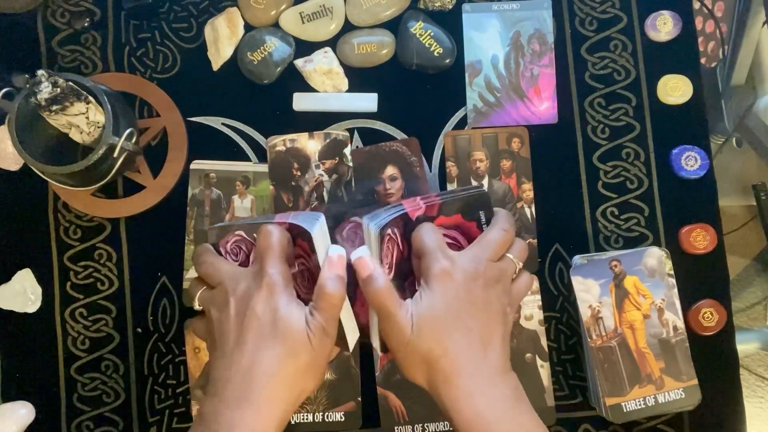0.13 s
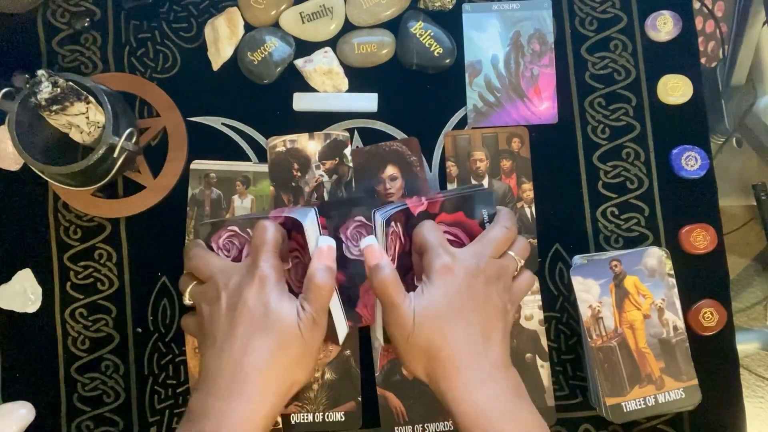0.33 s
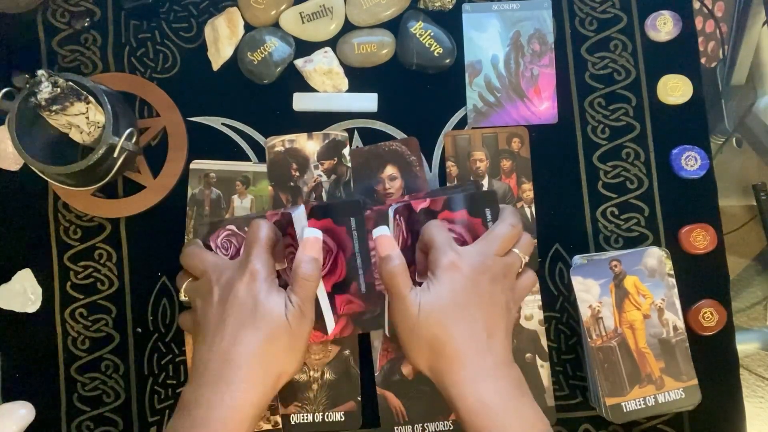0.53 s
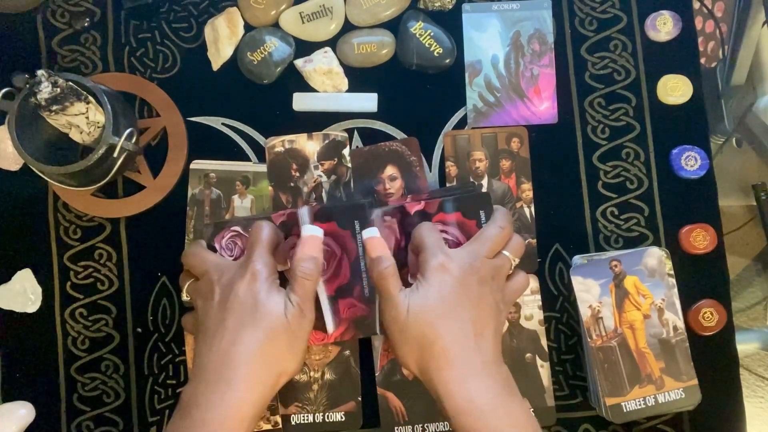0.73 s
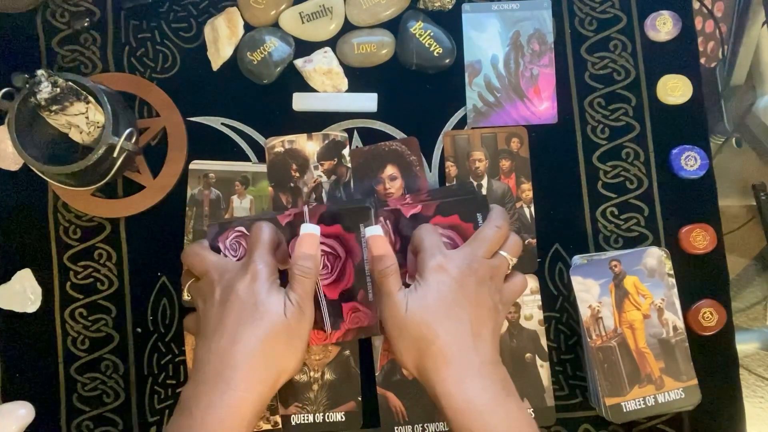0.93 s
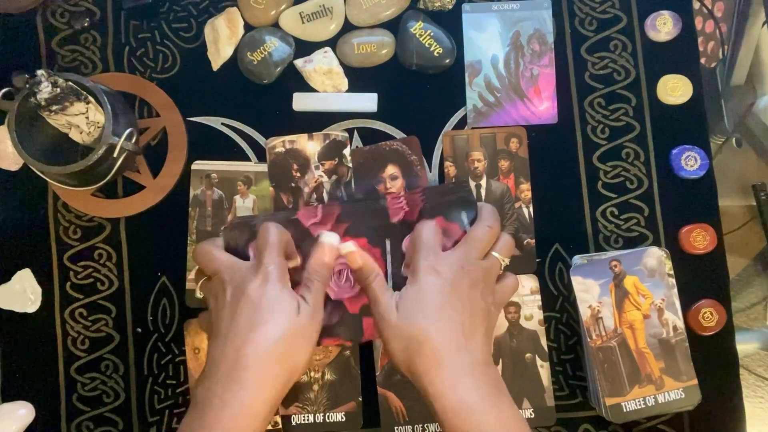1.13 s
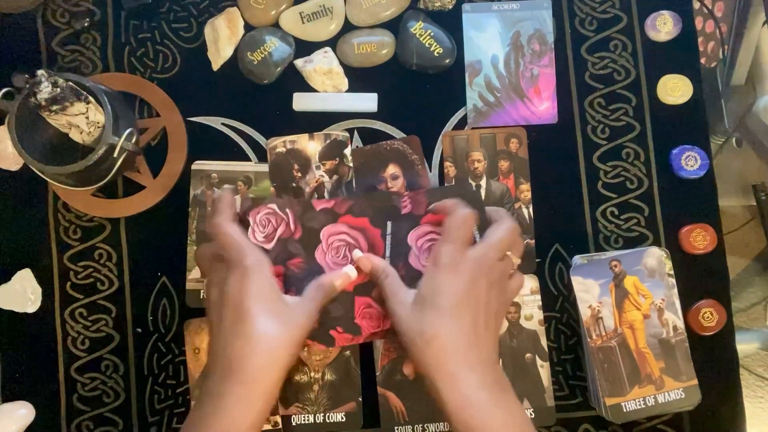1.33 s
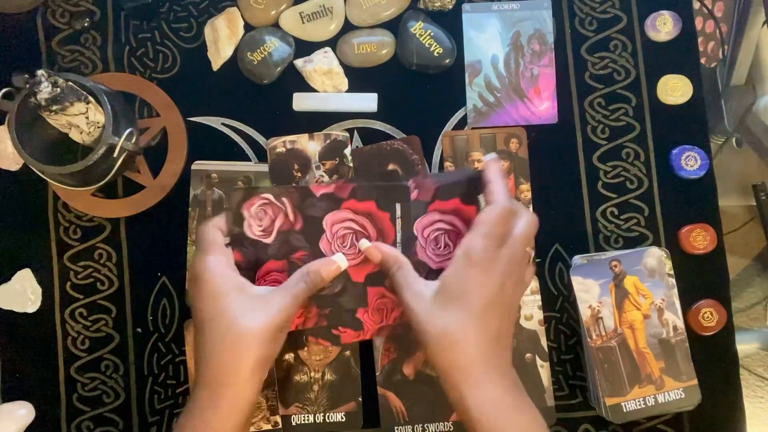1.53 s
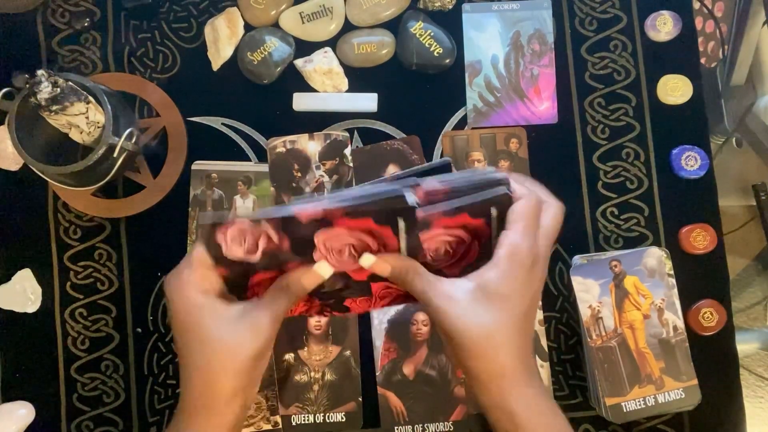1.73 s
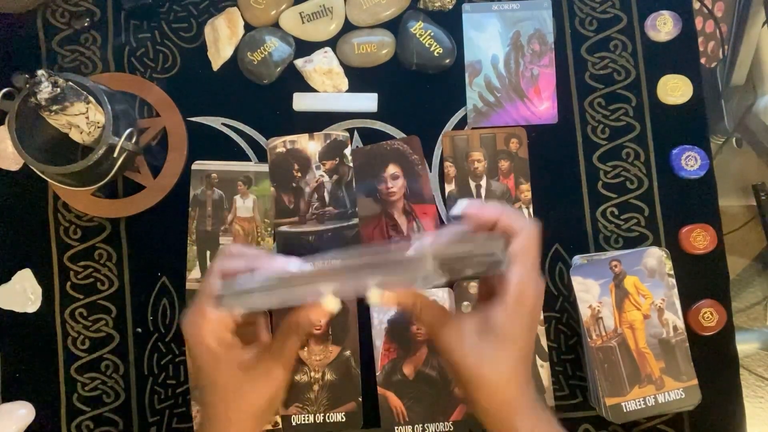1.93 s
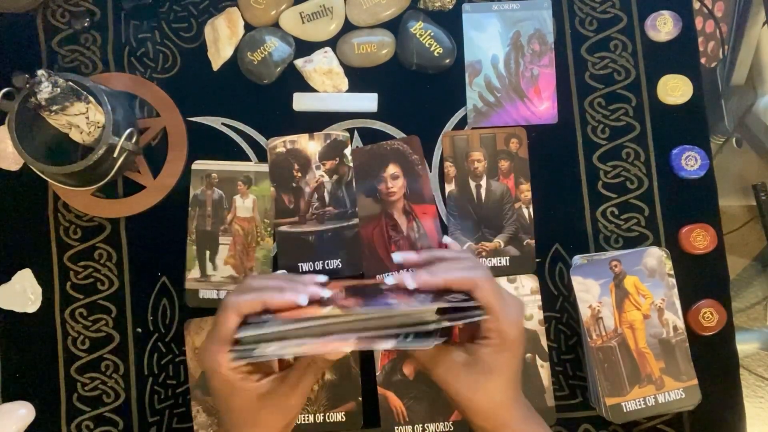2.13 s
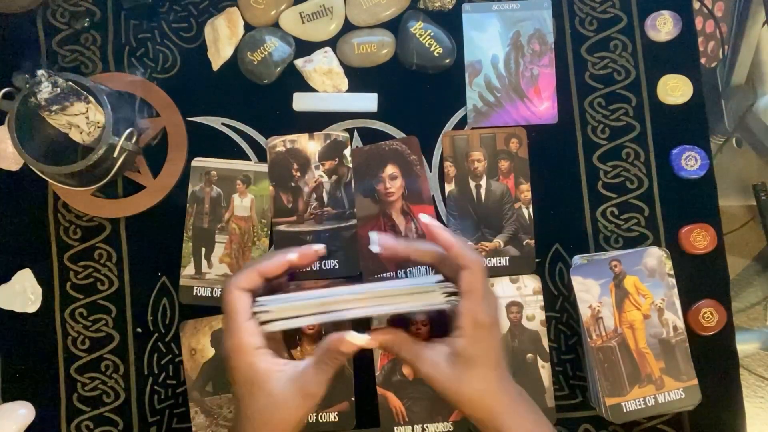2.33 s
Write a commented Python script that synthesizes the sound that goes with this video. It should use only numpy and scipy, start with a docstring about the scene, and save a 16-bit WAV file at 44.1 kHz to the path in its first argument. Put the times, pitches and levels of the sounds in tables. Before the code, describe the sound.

A deck of cards is riffle-shuffled close by, with uneven papery flicks and slaps for the first second. From about 1.1 seconds the halves are pushed together with light ticks and a soft slide, turning to a hollow hiss near 1.8 as the deck arches. At 2.1 it falls into one pile in a quick snapping flutter. Hands rumble faintly on the tablecloth in a small room.

```python
"""Uneven flicks and slaps: large cards scrape off the thumbs and land, riffled by hand over a
cloth-covered table in a small room. The halves are pushed together with a few light ticks, then
arched with a soft, hollow sliding hiss. The arch falls into one pile in a quick flutter: packets
snap flat, and the air pocket under them rings low, rising as it closes. Hands rumble on the
cloth; the cards set off a low room boom and a short ring."""
import sys
import numpy as np
from scipy import signal
from scipy.fft import rfft, irfft, next_fast_len
from scipy.io import wavfile
from scipy.ndimage import uniform_filter1d

SR = 44100
rng = np.random.default_rng(int(sys.argv[2]) if len(sys.argv) > 2 else 0)


def put_to_file(sound):
    """Save the sound as 16-bit audio at rate SR, in the file named by the first command-line argument."""
    columns = np.atleast_2d(sound).T  # one column per channel
    safe = np.clip(columns, -1, 1)
    whole_steps = np.round(safe * 32767)
    wavfile.write(sys.argv[1], SR, whole_steps.astype(np.int16))


N = 110250
TIME_S = np.arange(N) / SR

# room noise spectrum: f/Hz, relative level/dB
FLOOR_COLOUR = [(20, -32.5), (48, -2.5), (85, -16), (135, 1.5), (200, -4.5), (400, -14), (800, -14),
                (2000, -24), (6000, -31.5), (15000, -54)]
# hands on the cloth: t/s, level/dB
HANDS_LEVEL = [(0, -59), (.18, -45), (.5, -55), (.8, -55), (1.02, -45.5), (1.15, -63.5), (1.6, -63),
               (1.78, -55), (2.05, -61), (2.21, -60), (2.33, -54), (2.47, -59.5)]
# their spectrum: f/Hz, relative level/dB
CLOTH_COLOUR = [(25, -27), (45, 2.5), (90, -7), (127, 1), (170, -9.5), (260, -13.5), (500, -21.5),
                (1500, -55.5)]
# edges of the five contact bands (thud, slap, clack, crack, edge): f/Hz
CONTACT_BANDS_HZ = [250, 700, 1400, 2300, 5600, 15000]
# contact spectrum before band shaping: f/Hz, gain/dB
CONTACT_COLOUR = [(40, -17.5), (120, -7.5), (200, -9.5), (380, 5), (600, 6.5), (950, 15), (1400, 4),
                  (1900, -3), (2500, 1), (4500, 6.5), (7000, 0), (13000, -6), (16000, -13)]
# cards leaving the thumbs: t/s, 5 x band level/dB
FLICK_HITS = [(0.0338, -41.5, -41, -52.5, -53, -51), (0.0683, -42.5, -39.5, -40, -34.5, -36.5),
              (0.0783, -39, -58, -36, -43, -40), (0.0944, -84, -29.5, -28, -25, -28.5),
              (0.1264, -57, -34, -66, -40, -35), (0.146, -30.5, -26.5, -18.5, -27, -25),
              (0.1545, -42.5, -26, -25, -30, -28), (0.1706, -26.5, -28, -26.5, -26, -26),
              (0.2509, -70, -36.5, -34.5, -28, -30.5), (0.2705, -30.5, -25.5, -24.5, -22.5, -24.5),
              (0.2758, -29.5, -31.5, -22, -27, -29), (0.3088, -32.5, -25, -20.5, -23.5, -19),
              (0.3293, -45, -63, -53.5, -37, -34), (0.3492, -40, -39, -69.5, -49.5, -56),
              (0.3643, -34, -26.5, -26.5, -24.5, -21), (0.3922, -22.5, -18.5, -18.5, -26, -28),
              (0.4095, -39, -16.5, -22, -19.5, -17.5), (0.417, -31, -20.5, -16.5, -22, -19),
              (0.4261, -22.5, -14.5, -15, -22, -20), (0.4774, -57, -37, -36.5, -35.5, -40),
              (0.52, -37, -38, -51, -40, -42), (0.5331, -29, -24.5, -25, -26.5, -31.5),
              (0.621, -39, -33.5, -55, -45, -45), (0.631, -64, -36, -36, -36, -40),
              (0.6354, -22.5, -24, -20.5, -30.5, -30.5), (0.6462, -24, -16, -23.5, -28.5, -33.5),
              (0.7451, -35.5, -31.5, -38, -32, -36.5), (0.7609, -21, -19, -17.5, -23.5, -20.5),
              (0.7755, -27.5, -26.5, -21.5, -16.5, -16.5), (0.7785, -43, -28.5, -30, -18, -20.5),
              (0.8584, -45, -39, -47, -31, -34), (0.8752, -24, -18.5, -21, -22.5, -25.5),
              (0.9268, -53, -65, -34.5, -24, -30.5), (0.9418, -33.5, -32, -33.5, -30, -34),
              (0.968, -49, -28, -51, -27.5, -30.5), (0.9741, -35, -35, -29.5, -29, -29),
              (0.9833, -29.5, -25, -28, -34, -35), (1.0044, -39, -38, -31, -30, -27.5),
              (1.0212, -24.5, -20.5, -23, -22.5, -19.5), (1.0322, -34, -33, -29.5, -39, -32)]
# bent cards rustling under the thumbs: t/s, level/dB
RUSTLE_LEVEL = [(0.059, -62), (0.096, -38), (.13, -44), (.22, -48.5), (0.279, -35.5), (.46, -50),
                (.51, -58), (.58, -48), (.72, -56), (.81, -47), (.9, -49), (.98, -38.5), (1.041, -51),
                (1.1, -67)]
# rustle and flutter spectrum: f/Hz, relative level/dB
PAPER_COLOUR = [(60, -11), (250, 0.5), (500, 4.5), (900, 5), (1800, 1.5), (4000, -5.5), (8000, -10),
                (13000, -22), (16000, -22.5)]
# cards springing free: t/s, f/Hz, level/dB, t60/s
SPRING_RINGS = [(.364, 6560, -3.5, 0.0042), (0.774, 1950, -9.5, 0.04)]
# card faces sliding: t/s, level/dB
SLIDE_LEVEL = [(1.08, -57), (1.2, -61.5), (1.33, -76), (1.338, -47), (1.365, -58), (1.42, -53), (1.49, -63),
               (1.53, -50), (1.595, -60), (1.61, -50.5), (1.67, -50), (1.7, -58), (1.755, -64),
               (1.8, -45.5), (1.87, -45.5), (1.96, -56), (2.11, -53), (2.4, -81), (2.5, -59.5)]
# their spectrum: f/Hz, relative level/dB
HISS_COLOUR = [(100, -24), (400, -4), (900, -4.5), (2000, 1), (4000, -0.5), (8500, -8.5), (13000, -10),
               (16000, -17)]
# light ticks and a soft swell of sliding cards as the deck is handled: t/s, 5 x band level/dB
HANDLING_HITS = [(1.1184, -49.5, -66, -55, -53, -50), (1.1888, -53.5, -46, -44.5, -38, -45),
                 (1.3988, -63, -51.5, -40.5, -40, -40.5), (1.4273, -64, -51, -43.5, -49.5, -45),
                 (1.5256, -69, -63, -40, -44, -54), (1.5377, -47.5, -36.5, -40.5, -35.5, -39),
                 (1.6332, -48.5, -48, -33, -27, -31.5), (1.6459, -61, -37.5, -50, -63, -44),
                 (1.8805, -61, -73, -47, -39.5, -45), (2.418, -75, -56, -54, -52.5, -51)]
# hollow ring of the arched deck: t/s, level/dB
ARCH_LEVEL = [(1.74, -76), (1.775, -54.5), (1.87, -52.5), (2.1, -58.5)]
# its modes: f/Hz, bandwidth/Hz, relative level/dB
ARCH_RESONANCES = [(1620, 150, 0), (2280, 300, -6), (3050, 350, -6)]
# flutter of the falling arch: t/s, level/dB
FLUTTER_LEVEL = [(2.115, -60), (2.126, -28), (2.143, -35.5), (2.169, -29), (2.202, -28.5), (2.236, -46.5),
                 (2.331, -47), (2.39, -62.5)]
# packets snapping flat: t/s, 5 x band level/dB
SNAP_HITS = [(2.117, -76, -45, -39, -30.5, -38), (2.1298, -42, -34, -27, -27.5, -35),
             (2.1509, -29.5, -63, -21, -18.5, -29), (2.1705, -27, -27, -32, -22.5, -22.5),
             (2.1771, -30, -42, -23, -11.5, -26), (2.1962, -37, -51, -27.5, -21.5, -34),
             (2.2119, -32.5, -39, -27, -22.5, -30.5), (2.2492, -42, -46, -33, -45, -43),
             (2.2582, -45, -35.5, -29.5, -26, -32.5), (2.2895, -38.5, -35, -29, -26, -34)]
# air pocket under the falling arch: t/s, f/Hz, level/dB
POCKET_TRACK = [(2.115, 252.4, -81), (2.13, 256, -29), (2.201, 290, -34), (2.25, 306, -41.5),
                (2.3, 317.5, -70)]
# room boom and short ring set off by the cards: f/Hz, gain/dB, t60/s
LOW_RESONANCES = [(127, -60, .2), (398, -54, .08)]
# room tail: f/Hz, t60/s, level/dB, left-right correlation
ROOM_TAIL = [(60, 0.25, 7, 0.88), (137, 0.16, 6, 0.9), (348, 0.12, -1.5, 0.7), (940, 0.15, -9, -0.08),
             (2170, 0.16, -6, -0.44), (5030, 0.15, -10, 0.19), (13000, 0.16, -12.5, 0.43)]
# left microphone against right: f/Hz, phase lead/rad
LEFT_LEAD = [(40, 0.3), (400, -1.47), (1000, -0.65), (1600, -0.8), (2400, -2), (5200, -2.5), (6600, -5.5),
             (8600, -6), (10500, -2), (12500, 1.5), (15000, 1)]
# microphone response: f/Hz, gain/dB
MIC_COLOUR = [(8800, 0.5), (9700, 1.5), (10400, -14.5), (11300, -6.5), (12500, 1.5), (14300, -2),
              (15500, -17), (16400, -21.5)]


def from_db(db):
    """Decibels to gain."""
    return 10 ** (np.asarray(db) / 20)


def unit_rms(x):
    """Scale to unit rms."""
    return x / np.sqrt(np.mean(x ** 2) + 1e-20)


def envelope(curve):
    """Gain along a (t/s, level/dB) curve; -120 dB outside it."""
    t_s, db = np.transpose(curve)
    return from_db(np.interp(TIME_S, t_s, db, left=-120, right=-120))


def at_hz(table, hz, column=1):
    """Interpolate a table column over log frequency."""
    rows = np.array(table)
    return np.interp(np.log(np.maximum(hz, 1)), np.log(rows[:, 0]), rows[:, column])


def coloured(x, colour):
    """Minimum-phase filter with a (f/Hz, gain/dB) response."""
    n = 2 * next_fast_len(x.shape[-1])
    gain = from_db(at_hz(colour, np.fft.rfftfreq(n, 1 / SR)))
    cepstrum = irfft(np.log(gain))
    cepstrum[1:n // 2] *= 2
    cepstrum[n // 2 + 1:] = 0
    return irfft(rfft(x, n) * np.exp(rfft(cepstrum)))[..., :x.shape[-1]]


def ring(x, hz, t60_s):
    """Resonator: a unit click starts a decaying sine of height 1."""
    radius, step_rad = from_db(-60 / (t60_s * SR)), 2 * np.pi * hz / SR
    feedback = [1, -2 * radius * np.cos(step_rad), radius ** 2]
    return signal.lfilter([0, np.sin(step_rad)], feedback, x + 1e-18)


def stereo_noise(correlation, size):
    """Two correlated white noises."""
    mid, side = rng.standard_normal((2, size))
    return np.sqrt((1 + correlation) / 2) * mid + np.sqrt((1 - correlation) / 2) * side * [[1], [-1]]


def rumble(colour, correlation=0.66):
    """Coloured stereo noise at unit rms."""
    return unit_rms(coloured(stereo_noise(correlation, N), colour))


def hands():
    """Hands brush the cloth: a low rumble."""
    return envelope(HANDS_LEVEL) * rumble(CLOTH_COLOUR)


def shape_bands(hit, band_db, span_s=.0044):
    """Filter a stereo hit towards the band levels, taken as energy over span_s."""
    size = hit.shape[-1]
    hz = np.fft.rfftfreq(size, 1 / SR)
    power = np.sum(np.abs(rfft(hit)) ** 2, axis=0) / (size * span_s * SR)
    colour = []
    for lo, hi, target_db in zip(CONTACT_BANDS_HZ, CONTACT_BANDS_HZ[1:], band_db):
        present_db = 10 * np.log10(power[(hz >= lo) & (hz < hi)].sum())
        colour.append((np.sqrt(lo * hi), target_db - present_db))
    return coloured(hit, colour)


def contacts(hits, gain_db=0, bounce_share=.33):
    """Each edge scrapes free and lands in one pulse; hands, cards and table reflect the sound."""
    size, lead = 2048, 256
    firm_db, firm_rise_s, firm_fall_s = -15, .00097, .001
    scrape_share, scrape_hz, bounce_fall_s = .7, 1760, .003
    t_s = (np.arange(size) - lead) / SR
    firm_tau_s = np.where(t_s < 0, firm_rise_s, firm_fall_s)
    bounce_decay = (t_s > 0) * np.exp(-np.abs(t_s) / bounce_fall_s)
    highpass = signal.butter(1, scrape_hz, "high", fs=SR)
    out = np.zeros((2, N + size))
    for at_s, *band_db in hits:
        firmness = min(from_db(max(band_db[:-1]) - firm_db), 1)
        tau_s = firm_tau_s * (2 - firmness)  # light landings: longer, more papery
        swell = np.exp(-np.abs(t_s) / tau_s)
        scrape = signal.lfilter(*highpass, swell * rng.standard_normal(size))
        hit = scrape_share * scrape / np.linalg.norm(scrape)
        hit[lead] += 0.67 * firmness  # landing pulse
        bounce = bounce_decay * rng.standard_normal((2, size)) / np.linalg.norm(bounce_decay)
        hit = coloured(microphones(hit) + bounce_share * bounce, CONTACT_COLOUR)
        for _ in range(2):
            hit = shape_bands(hit, band_db)
        start = max(int(at_s * SR) - lead, 0)
        out[:, start:start + size] += hit
    return from_db(gain_db) * out[:, :N]


def riffle(paths=4):
    """Successive cards bend differently and radiate into the room along different paths."""
    return sum(in_room(contacts(FLICK_HITS[k::paths])) for k in range(paths))


def low_resonances(cards):
    """The cards set off a 127 Hz room boom and a short 398 Hz ring."""
    drive = cards.mean(axis=0)
    return sum(from_db(db) * ring(drive, hz, t60_s) for hz, db, t60_s in LOW_RESONANCES)


def rustle(curve, clicks_per_s, spread_db=4):
    """Many tiny edge contacts of uneven size, over a soft hiss."""
    sizes = from_db(spread_db * np.minimum(rng.exponential(1, N), 3))
    signs = rng.choice([-1, 1], N)
    clicks = sizes * signs * (rng.random(N) < clicks_per_s / SR)
    grains = unit_rms(clicks) + 0.53 * rng.standard_normal(N)
    return envelope(curve) * unit_rms(coloured(grains, PAPER_COLOUR))


def card_rings():
    """A bent card springs free and rings briefly at one pitch."""
    return sum(from_db(db) * ring(signal.unit_impulse(N, int(at_s * SR)), hz, t60_s)
               for at_s, hz, db, t60_s in SPRING_RINGS)


def sliding(catches_per_s=120, catch_db=17.5):
    """Card faces hiss over each other, catching at random."""
    catches = (rng.random(N) < catches_per_s / SR) * rng.standard_normal(N)
    friction = rng.standard_normal(N) + from_db(catch_db) * catches
    return envelope(SLIDE_LEVEL) * unit_rms(coloured(friction, HISS_COLOUR))


def arch():
    """The arched deck rings hollow: broad modes driven by noise."""
    hollow = 0
    for hz, width_hz, db in ARCH_RESONANCES:
        t60_s = np.log(1000) / (np.pi * width_hz)
        hollow += from_db(db) * unit_rms(ring(rng.standard_normal(N), hz, t60_s))
    return envelope(ARCH_LEVEL) * hollow


def air_pocket(waver_rms_hz=17):
    """The hollow under the cards rings low, rising in pitch as it closes."""
    t_s, hz, db = np.transpose(POCKET_TRACK)
    waver = unit_rms(uniform_filter1d(rng.standard_normal(N), size=300))
    pitch_hz = np.interp(TIME_S, t_s, hz) + waver_rms_hz * waver
    return envelope(np.c_[t_s, db]) * np.sin(2 * np.pi * np.cumsum(pitch_hz) / SR)


def microphones(x, left_db=-1.34):
    """Sound bends round the recorder: the left side is phase-shifted and softer."""
    n = x.shape[-1]
    lead_rad = at_hz(LEFT_LEAD, np.fft.rfftfreq(n, 1 / SR))
    left = from_db(left_db) * irfft(rfft(x) * np.exp(1j * lead_rad), n)
    return np.array([left, x])


def in_room(x, onset_s=.004):
    """Add a diffuse tail that decays band by band."""
    size = SR // 2
    t_s, hz = np.arange(size) / SR, np.fft.rfftfreq(size, 1 / SR)
    edges_hz = np.r_[0, np.geomspace(90, 16000, 13), SR]
    response = 0
    for lo, hi in zip(edges_hz, edges_hz[1:]):
        centre_hz, in_band = (lo + hi) / 2, (hz >= lo) & (hz < hi)
        t60_s, db, correlation = (at_hz(ROOM_TAIL, centre_hz, column) for column in (1, 2, 3))
        shape = from_db(-60 * t_s / t60_s) * (1 - np.exp(-t_s / onset_s))
        tail = irfft(rfft(stereo_noise(correlation, size)) * in_band, size) * shape
        response += from_db(db) * unit_rms(tail) * np.sqrt(in_band.mean() / size)
    return x + signal.fftconvolve(x, response, axes=1)[:, :N]


def scene():
    """Cards slightly right of the microphones, room around."""
    thumb_rustle = rustle(RUSTLE_LEVEL, clicks_per_s=240)
    flutter = rustle(FLUTTER_LEVEL, clicks_per_s=450)
    paper = thumb_rustle + card_rings() + sliding() + arch() + flutter
    handling = contacts(HANDLING_HITS, gain_db=-0.5, bounce_share=.36)
    snaps = contacts(SNAP_HITS, gain_db=-1)
    cards = riffle() + in_room(handling + snaps) + in_room(microphones(paper))
    cloth = hands()
    room_noise = from_db(-57.5) * rumble(FLOOR_COLOUR)
    return room_noise + cloth + cards + low_resonances(cards) + air_pocket()


def record(dry, low_cut_hz=13, high_cut_hz=16900, clip_level=.9):
    """Microphone treble notch, low cut, soft peak rounding, high cut."""
    low_cut = signal.butter(3, low_cut_hz, "high", fs=SR, output="sos")
    high_cut = signal.cheby2(16, 85, high_cut_hz, fs=SR, output="sos")
    x = signal.sosfilt(low_cut, coloured(dry, MIC_COLOUR))
    rounded = x / (1 + (x / clip_level) ** 4) ** .25
    return signal.sosfilt(high_cut, rounded)


dry = scene()
out = record(dry)
put_to_file(out)
```